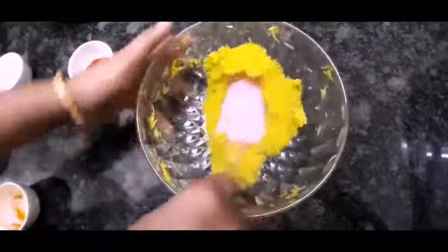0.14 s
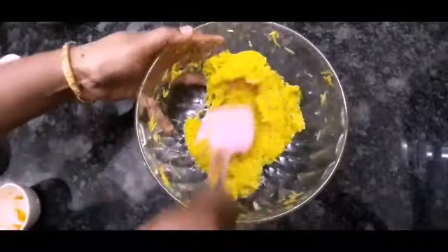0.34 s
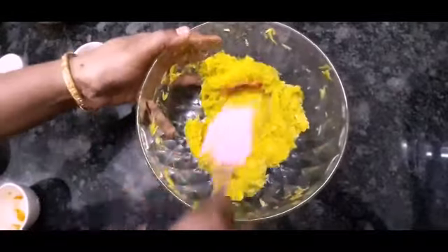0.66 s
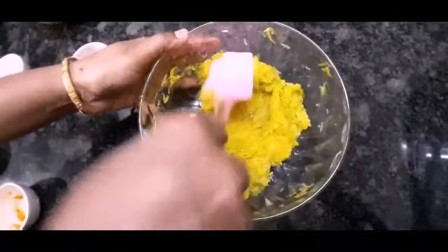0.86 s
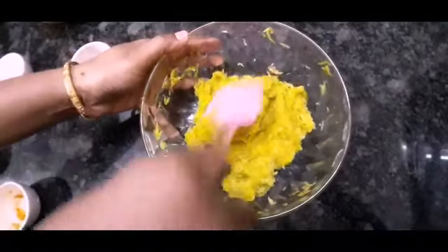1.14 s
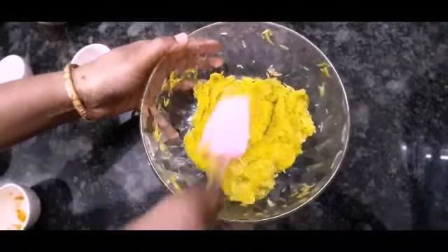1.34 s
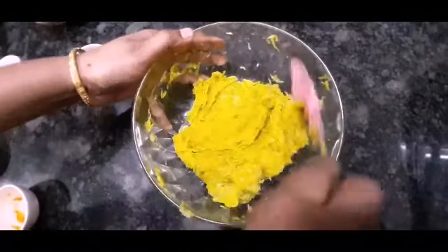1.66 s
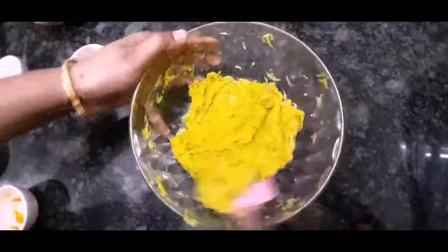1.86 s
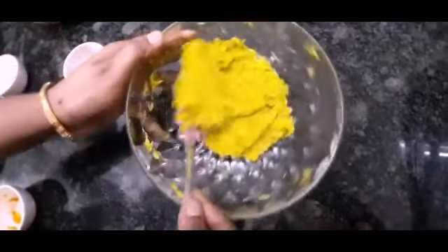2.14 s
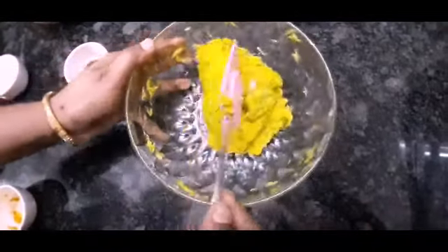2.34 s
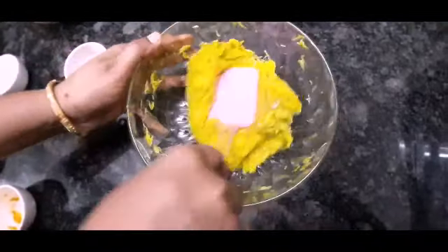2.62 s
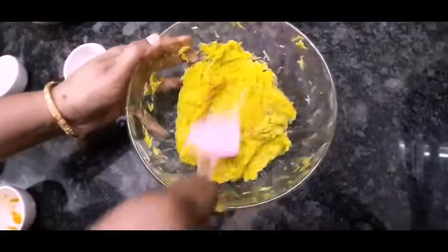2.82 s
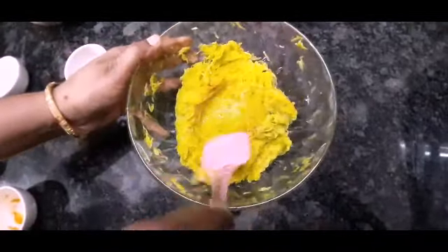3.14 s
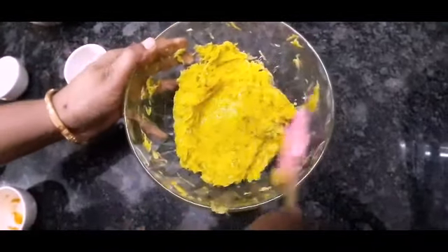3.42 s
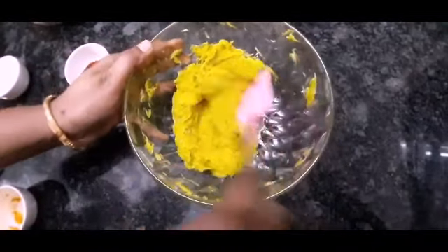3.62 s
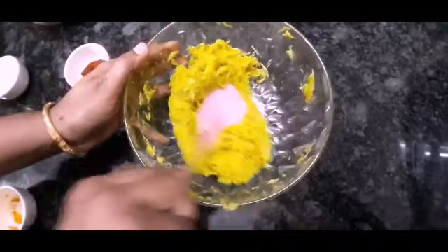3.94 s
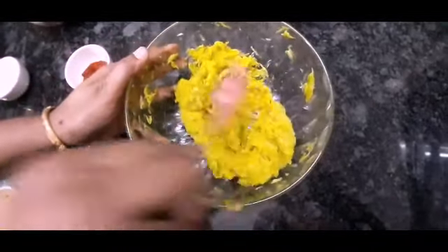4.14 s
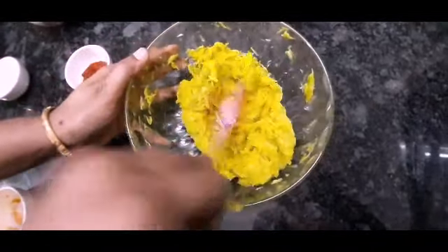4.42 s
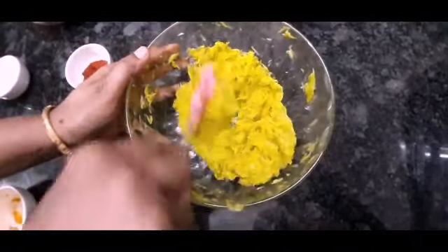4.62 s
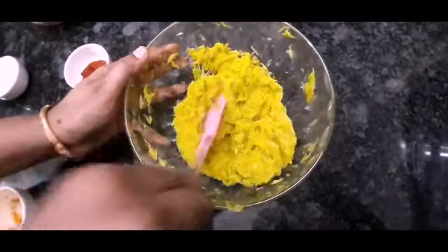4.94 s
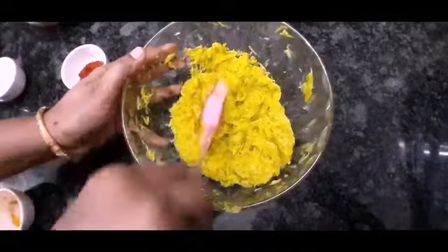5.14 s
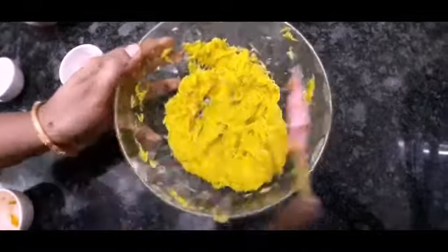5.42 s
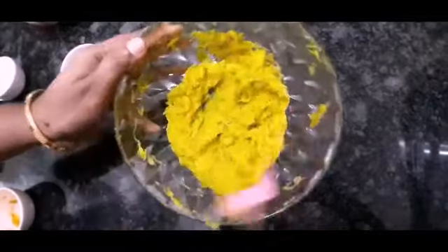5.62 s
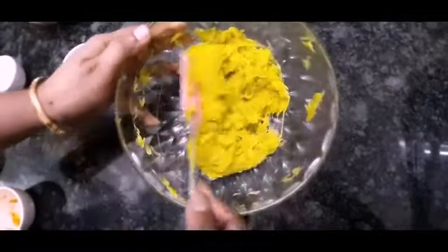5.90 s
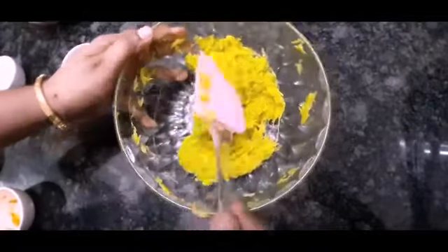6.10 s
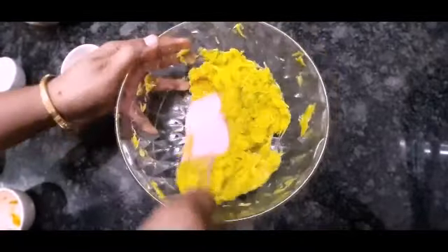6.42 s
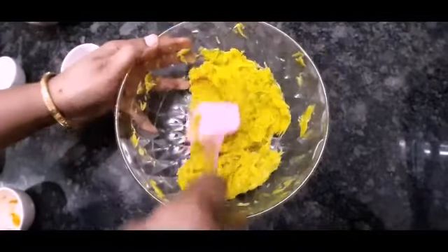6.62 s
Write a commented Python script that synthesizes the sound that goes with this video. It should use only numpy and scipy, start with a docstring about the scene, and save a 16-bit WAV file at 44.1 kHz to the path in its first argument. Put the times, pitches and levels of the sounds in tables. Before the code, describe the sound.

A silicone spatula folds moist mash in a glass bowl with crackly squelches, soft pops and three hard glassy knocks on a stone counter.

```python
"""A moist mash crackles and squelches first, close to the microphones, as a silicone spatula folds it.
Its glass bowl stands on a stone kitchen counter: shaped random grains tear and thud, noise puffs pop.
The bowl skids once, rolls and rocks on its foot, and three times knocks down hard; struck modes ring.
A small hard room answers with a decaying noise tail, over a steady hush."""
import sys
import numpy as np
from scipy import signal
from scipy.fft import rfft, irfft, next_fast_len
from scipy.io import wavfile

SR = 44100
rng = np.random.default_rng(int(sys.argv[2]) if len(sys.argv) > 2 else 0)


def store_pcm(level_fs):
    """Save levels as 16-bit WAV."""
    pcm = np.round(np.clip(level_fs, -1, 1) * 32767).astype(np.int16)
    wavfile.write(sys.argv[1], SR, np.atleast_2d(pcm).T)


N = 298116
TIME = np.arange(N) / SR   # s

# Steady hush of the kitchen. Each row: frequency in Hz, relative level in dB per Hz.
HUSH_SPECTRUM = [(25, -13), (50, 8), (100, -18), (160, 5), (320, 3), (550, -3), (1100, -12), (2180, -28.5),
                 (3200, -38.5), (13500, -20), (16000, -34)]
# The blade pushes through the mash. Each row: start in seconds, length in seconds,
# wet crackle in dB before its layer gain, squelch in dB, easing off over the push in dB.
STROKES = [(0.0, 0.045, -55, -60, -3), (0.12, 0.14, -71, -62.5, -0.5), (0.257, 0.2, -54.5, -62, 0.5),
           (0.643, 0.027, -54.5, -61, -4.5), (0.719, 0.17, -44, -53, 16.5), (1.062, 0.21, -51, -58, 2),
           (1.421, 0.16, -54.5, -65, 0.5), (1.891, 0.12, -53.5, -60.5, 0), (2.017, 0.35, -47, -50, 16.5),
           (2.344, 0.17, -53, -60.5, 0), (2.543, 0.11, -56.5, -54.5, -1.5), (2.771, 0.21, -52.5, -61, 1),
           (3.13, 0.013, -53.5, -59, 1), (3.266, 0.049, -60.5, -74.5, -3.5), (3.704, .13, -46.5, -49, 4.5),
           (4.004, .21, -54, -63.5, -4.5), (4.442, 0.094, -49.5, -63.5, -3), (4.743, 0.1, -55, -62, -8),
           (5.015, 0.0066, -57.5, -61.5, -8.5), (5.119, 0.024, -48.5, -52.5, 8),
           (5.279, 0.0093, -47, -55, 4), (5.383, 0.045, -53, -75, 13), (5.677, 0.056, -61.5, -62.5, -5.5),
           (5.776, 0.15, -47, -52, 3), (5.997, 0.15, -52, -65, -2), (6.378, 0.049, -57.5, -76, 2),
           (6.475, 0.01, -39, -31.5, 8.5), (6.562, 0.13, -59, -59.5, -6)]
# Tone of the tearing mash. Each row: frequency in Hz, relative level in dB per Hz.
CRACKLE_SPECTRUM = [(1500, -9.5), (3000, -6.5), (5200, -6), (6800, -5), (8500, 2.5), (10500, -3.5),
                    (13500, -6), (16000, -24)]
# Tone of the hollow wet squelch. Each row: frequency in Hz, relative level in dB per Hz.
SQUELCH_SPECTRUM = [(300, -7.5), (650, 7), (1100, -1), (1550, 6.5), (2300, -3), (2900, -12), (4500, -43)]
# Weight of the hand on the mash. Each row: time in seconds, thudding level in dB.
HAND_WEIGHT = [(0, -74), (.7, -60), (1.35, -55.5), (1.8, -64), (2.9, -59), (3.45, -87.5), (4.22, -59),
               (4.6, -73.5), (5.08, -59), (6.76, -65)]
# Tone of the pressing thuds. Each row: frequency in Hz, relative level in dB per Hz.
THUD_SPECTRUM = [(30, -29), (55, -9.5), (78, -8.5), (110, -17), (170, -13.5), (300, -13.5), (600, -51)]
# Air pockets burst in the mash. Each row: start in seconds, level in dB, pitch in Hz.
POPS = [(0.25, -38.5, 1530), (0.325, -44.5, 2400), (.411, -45, 2110), (0.697, -42, 2880), (1.71, -53, 1600),
        (2.02, -37.5, 3130), (2.22, -41, 2020), (2.914, -43.5, 1470), (2.967, -50.5, 2060),
        (4.557, -40.5, 1885), (4.7402, -44.5, 1660), (4.775, -46.5, 1420), (5.02, -43.5, 1670),
        (5.119, -43, 1480), (5.28, -37, 2400), (5.3523, -38.5, 1630), (6.42, -42.5, 1950)]
# The bowl rocks against the stone. Each row: start in seconds, level in dB,
# contact in milliseconds, extra hum of the wall in dB.
KNOCKS = [(0.2511, -31.5, 0.53, -2), (2.003, -25, 1.57, 0), (2.016, -18.5, 1.4, -0.5),
          (2.244, -31.5, 1.34, 16.5), (2.331, -29, 0.9, 0), (2.343, -37, 0.71, -5), (2.474, -23, 1.2, 11),
          (2.481, -16.5, 0.7, 20), (2.4924, -8.5, 0.62, 3.5), (2.4954, -0.5, 0.54, 1),
          (2.503, -21, 0.83, -0.5), (2.5146, -5, 0.18, -4.5), (3.6833, -2.5, 0.44, 1.5),
          (5.595, -29, 0.56, 12), (5.753, -25.5, 1.4, -9), (5.814, -29, 0.93, -10),
          (5.888, -34.5, 0.61, 21), (5.92, -32, 1.26, 5), (6.023, -30.5, 0.98, 1), (6.317, -29.5, 0.99, 15),
          (6.432, -28.5, 0.62, 12.5), (6.4615, 0, 0.4, 2), (6.4681, -8, 0.44, -2)]
# Modes of bowl on counter. Each row: nominal frequency in Hz, nominal level in dB, T60 in seconds.
BOWL_MODES = [(354, 1, 0.019), (465.4, -15.5, 0.14), (588, -17, 0.1), (625, -12.5, 0.12), (659.3, -2, 0.1),
              (682, -1.5, 0.032), (762.5, -13.5, 0.23), (874, -1.5, 0.18), (931.7, -3, 0.13),
              (1063, -9.5, 0.17), (1023, 11.5, 0.016), (1097, -3, 0.056), (1243, 0.5, 0.065),
              (1362, 4, 0.038), (1678, 2, 0.061), (1720, -9, 0.045), (2036, -1, 0.05), (2210, -9.5, 0.18)]
# Sticky film snaps off blade or glass. Each row: start in seconds, peak level in dB.
SNAPS = [(0.645, -36.5), (1.174, -36.5), (1.277, -35.5), (1.444, -30), (2.098, -36), (2.1732, -34),
         (2.347, -36), (3.368, -45.5), (3.633, -43.5), (4.165, -40.5), (4.388, -50), (4.411, -39),
         (4.605, -41.5), (4.861, -34.5), (5.277, -41), (5.74, -37), (5.8185, -33), (6.0134, -41),
         (6.088, -41), (6.427, -40)]
# The blade sings on wet glass. Each row: start in seconds, rms in dB before the swell,
# nominal starting pitch in Hz.
SQUEAKS = [(1.19, -60, 3060), (3.21, -63.5, 2240)]
# Tone of the juddering foot. Each row: frequency in Hz, relative level in dB per Hz.
JUDDER_SPECTRUM = [(40, -61), (80, -3), (170, 6.5), (330, 3), (620, -2), (950, -4.5), (1250, -32.5),
                   (3500, -34), (15000, -46)]
# The counter booms under the bowl. Each row: start in seconds, peak level in dB, length in seconds.
BOOMS = [(2.001, -32, 0.084), (2.056, -29.5, 0.042), (2.132, -37, 0.028), (2.385, -36.5, 0.085)]
# The tilted bowl rolls on its foot. Each row: start in seconds, length in seconds, level in dB.
ROLLS = [(2.18, 0.3, -56), (5.6, 0.86, -62)]
# Hard contacts ring the glass wall; the spot struck favours one register.
# Each row: start in seconds, level in dB, register in Hz.
CLINKS = [(2.495, -33.5, 4540), (2.515, -18.5, 8540), (2.5192, -17.5, 4506), (3.6843, -21, 6660),
          (6.461, -38, 9100)]
# Modes of the glass wall. Each row: nominal frequency in Hz, nominal level in dB, T60 in seconds.
GLASS_MODES = [(2760, -1.5, 0.031), (4430, -6.5, 0.024), (4520, -9.5, 0.022), (6530, -6, 0.02),
               (8060, -5, 0.028), (8550, -16.5, 0.013), (9190, 1.5, 0.0258)]
# Tone of the room's tail. Each row: frequency in Hz, relative level in dB per Hz.
ROOM_SPECTRUM = [(150, 15), (250, 1.5), (1100, 0.3), (2200, 1.77), (5000, 5.5)]
# Decay of the room. Each row: frequency in Hz, T60 in seconds.
ROOM_T60 = [(100, 0.76), (300, 0.58), (2500, 0.34), (12000, 0.14)]
# Stereo likeness. Each row: frequency in Hz, left-right correlation from 0 to 1.
LIKENESS = [(60, 0.94), (290, 0.82), (640, 0.67), (1400, 0.094), (3000, 0)]
# The bowl's place in the stereo field. Each row: frequency in Hz, left over right in dB at full lean.
LEAN = [(400, 2), (1300, -8.5), (2400, -22), (4400, 9.5), (8000, -3.5)]

HUSH_DB = -61
# the blade sinks in before each push: a fixed time plus a share of the push's length
BITE_S, BITE_SHARE = 0.022, 0.2
# the push fades into its release, and the torn mash settles
LET_GO_DB_PER_S, ROUND_S = 219.5, 0.013
# the mash clings to the moving blade between pushes
REST_CRACKLE_DB, REST_SQUELCH_DB = -75, -70.5
STICKY_DB, CATCHES_PER_S = 1.5, 46   # the blade catches and slips unevenly
HUM_HZ = 659   # the wall's main mode, which light rocking wakes most
SQUEAK_OCTAVES_PER_S = 0.505
# the bowl skids once on the stone, and friction brakes it
SKID_S, SKID_DB = 2.0, -32.5
SKID_ATTACK_S, SKID_BRAKE_DB_PER_S = 0.0032, 90.5
LOW_CUT_HZ, CUTOFF_HZ = 41, 15900
SIDES = np.array([[1], [-1]])   # left, right


def from_db(db):
    """Decibels to gain."""
    return 10 ** (np.asarray(db) / 20)


def rms_one(x):
    """Scale to rms 1."""
    return x / np.sqrt(np.mean(x ** 2) + 1e-20)


def at_hz(points, hz):
    """Read a table on a log-frequency axis."""
    f, value = np.transpose(points)
    return np.interp(np.log(hz + 1e-9), np.log(f), value)


def add(out, s, sound):
    """Mix a sound in at s seconds."""
    i = round(s * SR)
    out[:, i:i + sound.shape[-1]] += sound[..., :N - i]


def filtered(x, order, hz, kind="low"):
    """Pass a sound through a Butterworth filter."""
    return signal.sosfilt(signal.butter(order, hz, kind, fs=SR, output="sos"), x)


def wander(per_s, size=N):
    """A random line that turns so many times a second."""
    return np.interp(TIME[:size] * per_s, np.arange(SR), rng.standard_normal(SR))


def colour(x, spectrum, lean=0):
    """Shape two unrelated channels: likeness and lean to one side vary by frequency; rms 1."""
    length = x.shape[-1]
    size = next_fast_len(length)
    hz = np.fft.rfftfreq(size, 1 / SR)
    mid, side = rfft(x, size)
    alike = np.clip(at_hz(LIKENESS, hz), 0, 1)
    pair = np.sqrt(1 + alike) * mid + SIDES * np.sqrt(1 - alike) * side
    gain_db = at_hz(spectrum, hz) + SIDES * lean * at_hz(LEAN, hz) / 2
    return rms_one(irfft(pair * from_db(gain_db), size)[:, :length])


def grains(per_s, spread_db, grain_s):
    """Random tiny ruptures of uneven size, each a briefly decaying scatter of noise in both channels."""
    sizes = from_db(spread_db * np.minimum(rng.exponential(1, N), 4))
    energy = (rng.random(N) < per_s / SR) * sizes ** 2
    energy = signal.lfilter([1], [1, -np.exp(-2 / (grain_s * SR))], energy + 1e-12)
    return np.sqrt(energy) * rng.standard_normal((2, N))


def burst(low_hz, high_hz, decay_s):
    """A short puff of noise in a band, with its mono sum at peak 1."""
    t = TIME[:SR // 20]
    puff = rng.standard_normal((2, len(t))) * np.exp(-t / decay_s)
    puff = filtered(puff, 2, [low_hz, min(high_hz, 0.45 * SR)], "band")
    return puff / np.abs(puff.mean(axis=0)).max()


def favour(modes, hz, lift_db, octaves):
    """The same modes, with those near one pitch struck harder."""
    f, db, t60 = np.transpose(modes)
    nearness = np.exp(-(np.log2(f / hz) / octaves) ** 2)
    return np.transpose([f, db + lift_db * nearness, t60])


def ringing(modes, uneven_db=1.5, detune=0.004, phase_spread=1.1):
    """One blow on decaying modes, each with its own phase difference between channels, small in the bass."""
    hz, db, t60 = np.transpose(modes)[:, :, None]
    t = TIME[:SR // 4]
    # the shifting mash loads the wall differently at each blow
    hz = hz * (1 + detune * rng.standard_normal(hz.shape))
    strength = from_db(db + uneven_db * rng.standard_normal(hz.shape) - 60 * t / t60)
    phase = phase_spread * np.minimum(hz / 1000, 1) * rng.uniform(-1.365, 1, hz.shape)   # radians
    phase = phase * SIDES[:, :, None]
    return np.sum(strength * np.cos(2 * np.pi * hz * t + phase), axis=1)


def hush():
    """The steady hush around the microphones: coloured noise."""
    return from_db(HUSH_DB) * colour(rng.standard_normal((2, N)), HUSH_SPECTRUM)


def strokes():
    """Crackle and squelch in dB: each push bites, eases off or bears down, then lets go."""
    coarse = TIME[::10]
    power = from_db([[REST_CRACKLE_DB], [REST_SQUELCH_DB]]) ** 2 * np.ones(len(coarse))
    for s, length, crackle_db, squelch_db, ease_db in STROKES:
        t = coarse - s
        swell = np.clip(1 + t / (BITE_S + BITE_SHARE * length), 0, 1)
        bite = np.sin(np.pi / 2 * swell) ** 2
        released_s = ROUND_S * np.logaddexp(0, (t - length) / ROUND_S)   # time since the push, rounded in
        fall_db = ease_db * np.clip(t / length, 0, 1) + LET_GO_DB_PER_S * released_s
        power = power + (from_db([[crackle_db], [squelch_db]]) * bite * from_db(-fall_db)) ** 2
    levels_db = np.array([np.interp(TIME, coarse, 10 * np.log10(p)) for p in power])
    return levels_db + STICKY_DB * wander(CATCHES_PER_S)


def mash(crackle_gain_db=-1.5, threads_per_s=450, smear_db=-6, tack_db=-5):
    """Smearing tears countless wet threads, louder in a harder stroke, with tacky ticks over a squelch."""
    crackle_db, squelch_db = strokes()
    threads, edges = 0, np.linspace(1200, 16000, 8)   # Hz
    for band in zip(edges, edges[1:]):   # each register has its own ticks and flutter
        per_s = threads_per_s * np.mean(band) / 8000   # thick, low threads are fewer
        ticks = rms_one(grains(per_s, spread_db=4.6, grain_s=0.0014))
        ticks = ticks * from_db(1.5 * wander(CATCHES_PER_S))
        threads = threads + filtered(ticks, 2, band, "band")
    smear = rms_one(grains(1200, spread_db=4.5, grain_s=0.001))   # sounds in all registers at once
    tack = rms_one(grains(70, spread_db=3.5, grain_s=0.0007))
    rubbing = rms_one(threads) + from_db(smear_db) * smear + from_db(tack_db) * tack
    bubbles = grains(380, spread_db=3.4, grain_s=0.0028)
    crackle = from_db(crackle_db + crackle_gain_db) * colour(rubbing, CRACKLE_SPECTRUM, lean=0.58)
    return crackle + from_db(squelch_db) * colour(bubbles, SQUELCH_SPECTRUM, lean=1.0)


def press_thuds():
    """The hand's weight on the mash thuds through the bowl in low, dense grains."""
    weight_db = np.interp(TIME, *np.transpose(HAND_WEIGHT))
    return from_db(weight_db) * colour(grains(160, spread_db=6.5, grain_s=0.023), THUD_SPECTRUM)


def pops(smack_db=0.5, spray_db=-8, right_db=3):
    """Air pockets open with a crack, a hollow smack to the right and a fine spray."""
    out = np.zeros((2, N))
    for s, db, hz in POPS:
        smack = burst(hz * 0.78, hz * 1.24, decay_s=0.0059) * from_db(-SIDES * right_db)
        add(out, s, from_db(db + smack_db) * smack)
        add(out, s, from_db(db) * burst(700, 2700, decay_s=0.00092))
        add(out, s, from_db(db + spray_db) * burst(4200, 11000, decay_s=0.017))
    return out


def knocks(right_db=1.85, low_cut_hz=270, chatter_db=-19):
    """The bowl rocks on its foot, right of centre; a longer, softer contact favours the low modes."""
    out, ms = np.zeros((2, N)), TIME[:SR // 30] * 1000
    for s, db, contact_ms, hum_db in KNOCKS:
        push = np.sin(np.pi * np.minimum(ms / contact_ms, 1)) * np.exp(-ms / contact_ms)
        # the foot chatters on the stone for a moment as it settles
        push = push + from_db(chatter_db) * rng.standard_normal(len(ms)) * np.exp(-ms / 12)
        ring = ringing(favour(BOWL_MODES, HUM_HZ, hum_db, octaves=0.1))
        blow = signal.fftconvolve(ring, push[None], axes=1)
        blow = filtered(blow, 2, low_cut_hz, "high")   # a small bowl radiates little bass
        blow = filtered(blow, 2, 1000 / max(contact_ms, 0.1))   # softness of the contact
        blow = filtered(blow, 4, 2600)   # the mash deadens the treble
        add(out, s, from_db(db) * blow / np.abs(blow).max())
    return out * from_db(-SIDES * right_db)


def snaps():
    """Sticky films snap with a bright tick of narrow-band noise."""
    out = np.zeros((2, N))
    for s, db in SNAPS:
        low_hz, high_hz = np.array([7200, 10500]) * rng.uniform(0.9, 1.1)
        add(out, s, from_db(db) * burst(low_hz, high_hz, decay_s=0.0016))
    return out


def squeaks(length_s=0.12):
    """Rubber sticks and slips in broken chirps, at a rising and unsteady pitch."""
    out, swell = np.zeros((2, N)), signal.windows.hann(int(length_s * SR))
    size = len(swell)
    for s, db, hz in SQUEAKS:
        octaves = SQUEAK_OCTAVES_PER_S * TIME[:size] + 0.11 * wander(700, size)
        tone = np.sin(2 * np.pi * np.cumsum(hz * 2 ** octaves) / SR)
        rub = tone * from_db(6 * wander(130, size))
        add(out, s, from_db(db) * rms_one(rub) * swell)
    return out


def skid():
    """Strength of the skid: the foot breaks loose at once and slows steadily."""
    t = np.maximum(TIME - SKID_S, 0)
    return np.minimum(t / SKID_ATTACK_S, 1) * from_db(SKID_DB - SKID_BRAKE_DB_PER_S * t)


def judder():
    """The skidding foot judders on the stone in short, dense grains."""
    return skid() * colour(grains(260, spread_db=-1.5, grain_s=0.0037), JUDDER_SPECTRUM)


def clatter(level_db=-9, slips_per_s=260, soft_hz=900):
    """The skidding foot slips in tiny soft jerks, and each one rings the bowl's low modes."""
    slips = (rng.random(N) < slips_per_s / SR) * rng.choice([-1, 1], N)
    rattle = signal.fftconvolve(ringing(BOWL_MODES), slips[None], axes=1)[:, :N]
    rattle = filtered(rattle, 2, soft_hz)
    return from_db(level_db) * skid() * rms_one(rattle)


def booms(boom_hz=75):
    """The counter booms under the bowl: low sine swells whose pitch wavers."""
    out = np.zeros((2, N))
    for s, db, length in BOOMS:
        size = int(length * SR)
        pitch = boom_hz * (1 + 0.1 * wander(60, size))
        tone = np.sin(2 * np.pi * np.cumsum(pitch) / SR)
        add(out, s, from_db(db) * signal.windows.tukey(size, 0.5) * tone)
    return out


def rolls():
    """The tilted foot grinds over the stone and keeps the wall's main mode murmuring."""
    out = np.zeros((2, N))
    for s, length, db in ROLLS:
        swell = signal.windows.tukey(int(length * SR), 0.5)
        grit = rng.standard_normal(len(swell)) * swell
        ring = ringing(favour(BOWL_MODES, HUM_HZ, 20, octaves=0.1))
        hum = signal.fftconvolve(ring, grit[None], axes=1)
        add(out, s, from_db(db) * rms_one(hum))
    return out


def clinks(crack_db=-5, register_db=10):
    """Bare glass on stone: a crack and a brief high ring."""
    out = np.zeros((2, N))
    for s, db, hz in CLINKS:
        ring = ringing(favour(GLASS_MODES, hz, register_db, octaves=0.15))
        add(out, s, from_db(db) * ring / np.abs(ring).max())
        add(out, s, from_db(db + crack_db) * burst(1570, 9000, decay_s=0.00064))
    return out


def kitchen(x, wet_db=-6.0, build_s=0.000653, standing_hz=130, standing_db=-46):
    """Hard walls return a dense tail that dies sooner in the treble; one low standing wave lingers."""
    t, edges = TIME[:SR * 3 // 4], np.geomspace(70, 18000, 9)
    white, tail = rng.standard_normal((2, 2, len(t))), 0
    for k, band in enumerate(zip(edges, edges[1:])):
        noise = filtered(white[k % 2], 2, band, "band")
        tail = tail + noise * from_db(-60 * t / at_hz(ROOM_T60, np.sqrt(np.prod(band))))
    tail = colour(tail * (1 - np.exp(-t / build_s)), ROOM_SPECTRUM) / np.sqrt(len(t))   # unit energy
    standing_fade = from_db(standing_db - 60 * t / at_hz(ROOM_T60, standing_hz))
    standing = standing_fade * np.sin(2 * np.pi * standing_hz * t)
    return signal.fftconvolve(x, from_db(wet_db) * tail + standing, axes=1)[:, :N]


def scene(thin_hz=230):
    """Bowl, mash and counter in the kitchen, over its steady hush."""
    wet = mash() + pops() + snaps() + squeaks()
    low = press_thuds() + judder() + booms()
    bowl = knocks() + clatter() + rolls()
    glass = clinks()
    # the counter's thuds travel mostly through the stone, so the room gets little of them
    to_room = bowl + from_db(-3.5) * glass + from_db(-0.5) * wet + from_db(-16) * low
    near = filtered(bowl, 2, thin_hz, "high")   # the bowl's bass arrives mostly by way of the room
    return near + glass + wet + low + kitchen(to_room) + hush()


def record(dry):
    """The microphone sheds the deepest bass, and the top is cut."""
    thinned = filtered(dry, 2, LOW_CUT_HZ, "high")
    return signal.sosfilt(signal.ellip(10, 0.2, 80, CUTOFF_HZ, fs=SR, output="sos"), thinned)


dry = scene()
out = record(dry)
store_pcm(out)
```